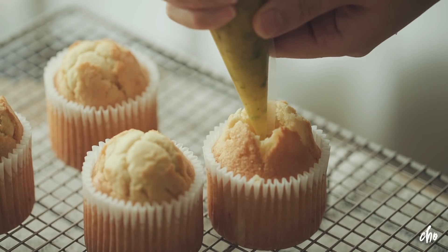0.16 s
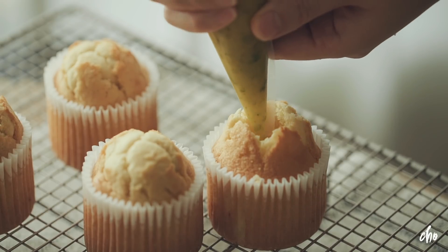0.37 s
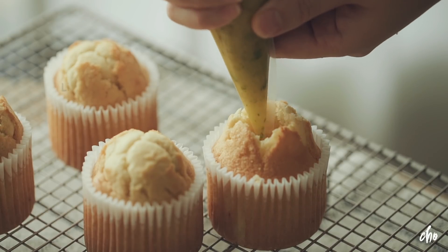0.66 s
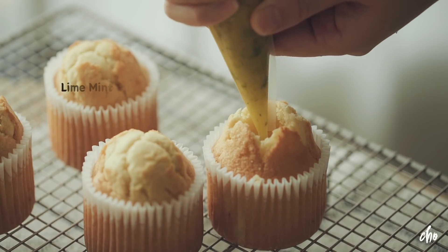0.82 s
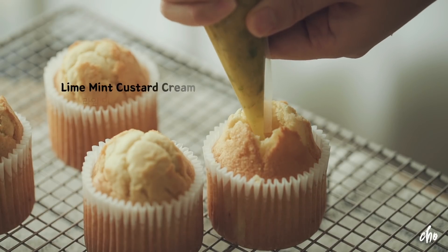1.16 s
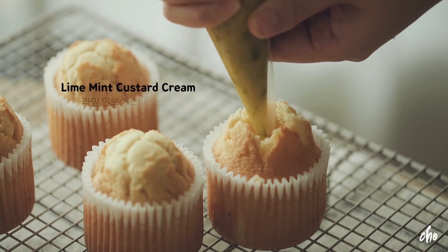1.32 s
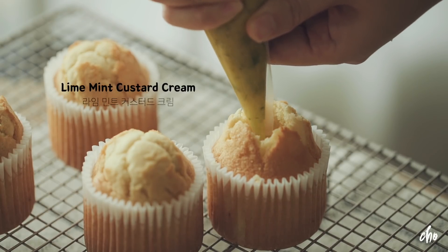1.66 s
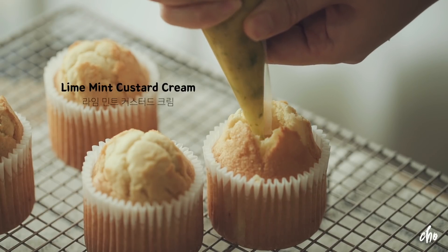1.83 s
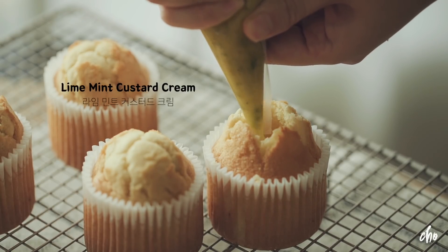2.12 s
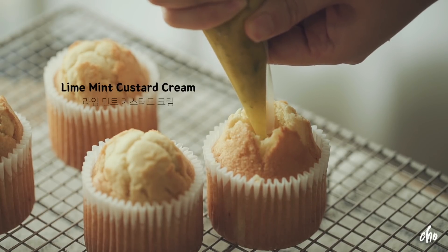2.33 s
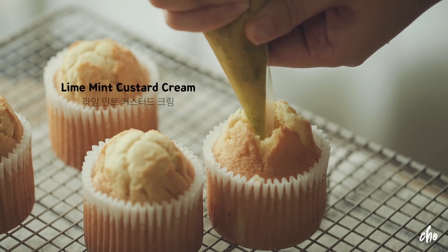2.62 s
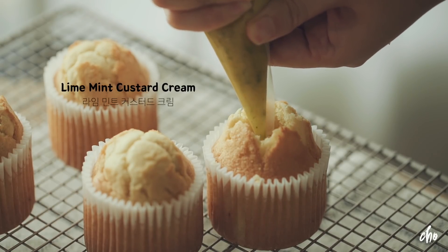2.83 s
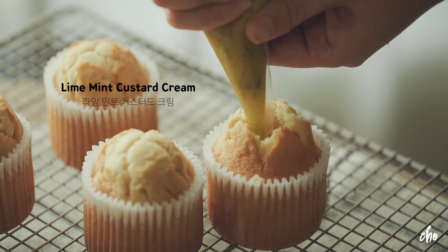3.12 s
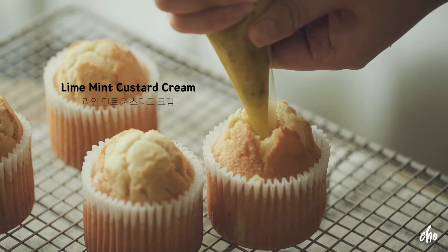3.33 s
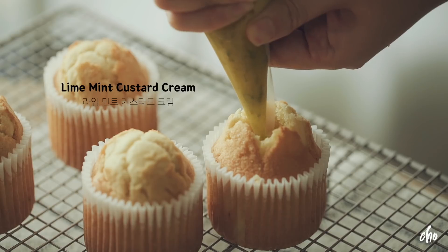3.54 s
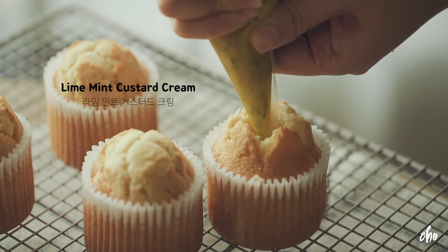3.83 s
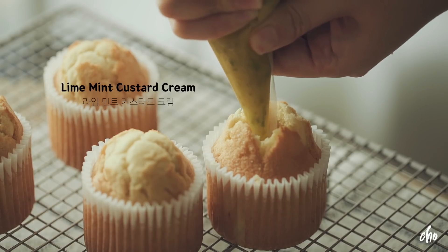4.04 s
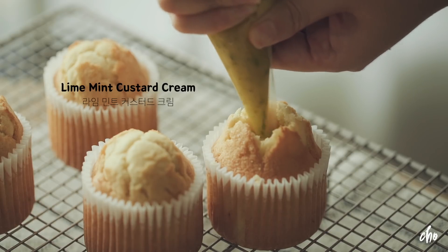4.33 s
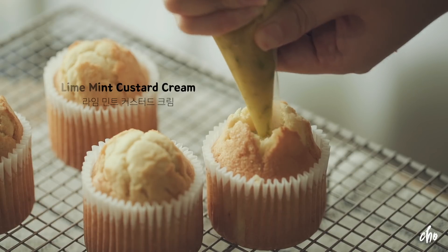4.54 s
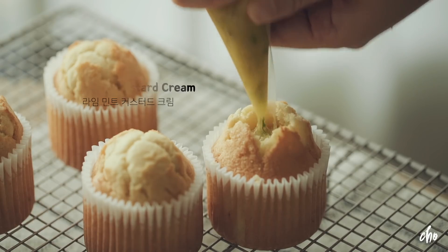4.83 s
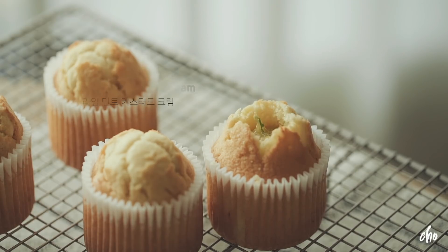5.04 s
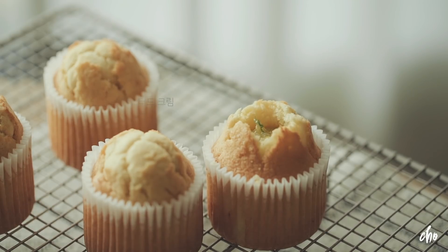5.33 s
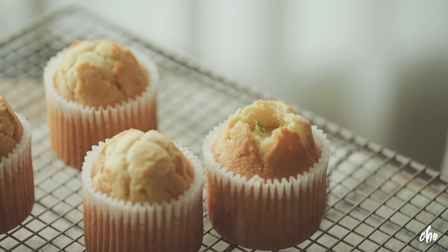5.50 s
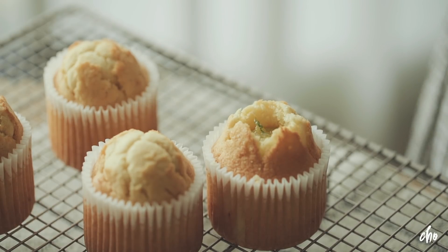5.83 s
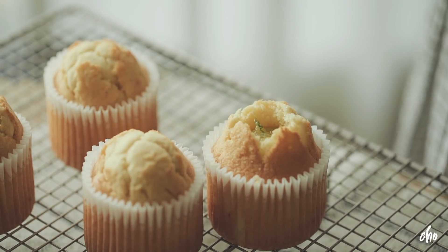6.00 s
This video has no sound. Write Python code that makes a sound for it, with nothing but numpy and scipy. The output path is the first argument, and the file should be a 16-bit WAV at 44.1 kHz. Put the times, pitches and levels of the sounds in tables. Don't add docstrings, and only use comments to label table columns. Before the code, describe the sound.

A thin plastic piping bag ticks and snaps as it is squeezed in a quiet kitchen, then is lifted and dropped in a loud crackling heap.

```python
import sys
import numpy as np
from scipy import signal
from scipy.fft import rfft, irfft, next_fast_len
from scipy.io import wavfile
from scipy.ndimage import map_coordinates

SR = 44100
rng = np.random.default_rng(int(sys.argv[2]) if len(sys.argv) > 2 else 0)


def transcribe(u):
    v = np.clip(np.atleast_2d(u).T, -1, 1)
    q = np.round(v * 32767).astype(np.int16)
    wavfile.write(sys.argv[1], SR, q)


def natural_amplitude(level_db):
    exponent = np.asarray(level_db, float) / 20
    return 10 ** exponent


N = 271656


def unit(x):
    return x / np.sqrt(np.mean(x ** 2) + 1e-20)


def along(points, hz):
    f, v = np.transpose(points)
    return np.interp(np.log(hz + 1), np.log(f + 1), v)


def curves(rows):
    s, *columns = np.transpose(rows)
    return [np.interp(np.arange(N) / SR, s, column, -140, -140) for column in columns]


def wobble(rate):
    knots = rng.standard_normal(int(N * rate / SR) + 4)
    return map_coordinates(knots, [np.arange(N) * rate / SR])


def filtered(x, response):
    m = next_fast_len(N + 8192)
    return irfft(rfft(x, m) * response(np.fft.rfftfreq(m, 1 / SR)), m)[..., :N]


def modes(rows, f):
    total = 0
    for k, (hz, width, db) in enumerate(rows):
        total = total + (-1) ** k * natural_amplitude(db) * 1j * f * width / (hz ** 2 - f * f + 1j * f * width)
    return total


def band(centre_hz, width_hz, f):
    return modes([(centre_hz, width_hz, 0)], f) ** 2


def highpass(corner_hz, f):
    return 1j * f / (1j * f + corner_hz)


def add(track, s, piece):
    i = round(s * SR)
    track[i:i + len(piece)] += piece[:N - i]


# f/Hz, level/dB per Hz
ROOM_MURMUR = [(21, -57), (35, -37), (114, -20), (167, -10.5), (233, -10.5), (265, -4), (317, -13.5),
               (410, -14), (720, -15), (1140, -19.5), (2220, -27.5), (2400, -28), (3180, -30), (16000, -37)]
# f/Hz, likeness (1 = same)
LEFT_RIGHT_LIKENESS = [(60, 1), (130, 0.82), (290, 0.77), (640, 0.37), (1410, 0.44), (3100, -0.025),
                       (6820, -0.37), (15000, -0.1)]
# f/Hz, width/Hz, level/dB
FRIDGE_HUM = [(179, 19, -7.5), (271, 27.4, 1.5), (452, 59, -6.5)]


def air():
    air_db = -54.5

    def split(f):
        turn = np.arccos(np.clip(along(LEFT_RIGHT_LIKENESS, f), -1, 1)) / 2
        return natural_amplitude(along(ROOM_MURMUR, f)) * [np.cos(turn), np.sin(turn)]

    mid, side = filtered(rng.standard_normal((2, N)), split)
    murmur = unit(np.array([mid + side, mid - side]))
    hum = unit(filtered(rng.standard_normal(N), lambda f: modes(FRIDGE_HUM, f)))
    return natural_amplitude(air_db - 1.5 + 0.6 * wobble(3)) * murmur + natural_amplitude(air_db - 7 + 1.2 * wobble(6)) * hum


# f/Hz, time to fall 60 dB/s
ROOM_DECAY = [(300, 0.62), (2000, 0.47), (8000, 0.43), (16000, 0.95)]


def kitchen(x, rise_s, top_hz):
    noise = rng.standard_normal(SR // 2) + 0.5 * rng.standard_normal((2, SR // 2))
    hz, t, z = signal.stft(noise, SR, nperseg=256)
    decay = natural_amplitude(-60 * t / along(ROOM_DECAY, hz)[:, None])
    shape = decay * (1 - np.exp(-t / rise_s)) / np.hypot(1, hz / top_hz)[:, None]
    tail = signal.istft(z * shape, SR, nperseg=256)[1]
    delayed = np.pad(x, (150, 0))[None]
    return signal.fftconvolve(delayed, tail / np.linalg.norm(tail[0]), axes=1)[:, :N]


def pair(x, lead_s, spread):
    def phase(f):
        ripple = np.clip(spread, 0, 1) * np.sin(f / 900) * f / (f + 4000)
        return np.pi * f * lead_s + ripple

    return filtered(x, lambda f: np.exp(1j * np.outer([1, -1], phase(f))))


# t/s, force level/dB
DRAG_FORCE = [
    (0.88, -75),
    (0.944, -55),
    (0.994, -64.5),
    (1.042, -36),
    (1.102, -37),
    (1.126, -47),
    (1.318, -48.5),
    (1.4, -63),
    (1.45, -59),
]
# t/s, peak level/dB
DRAG_SLIPS = [(1.018, -29.5), (1.037, -24), (1.053, -23.5), (1.066, -39), (1.076, -24.5), (1.087, -22.5),
              (1.11, -40), (1.136, -50), (1.15, -32.5), (1.158, -40), (1.176, -32), (1.204, -47),
              (1.25, -43), (1.27, -35.5), (1.289, -36), (1.323, -41)]
# f/Hz, width/Hz, level/dB
WOODEN_BODY = [(187, 82, -4), (257, 41, -2), (307, 37, 0.5)]
# f/Hz, level/dB per Hz
SCRAPE_COLOUR = [(500, -11), (830, 0.5), (1230, -1), (1600, 0), (1950, -8), (2350, -8.5), (2900, -10.5),
                 (3500, -11.5), (4200, -26), (8000, -24.5), (12000, -120)]


def drag():
    groan_db, = curves(DRAG_FORCE)
    pushes = natural_amplitude(groan_db + 1) * rng.standard_normal(N) / 4
    for s, db in DRAG_SLIPS:
        pushes[round(s * SR)] += natural_amplitude(db + 40) * np.sign(rng.standard_normal())
    groan = filtered(pushes, lambda f: modes(WOODEN_BODY, f) * band(336, 560, f) * highpass(110, f) ** 2)

    late = np.arange(N) / SR - 1.042
    hold_s, rise_db_per_s, fall_db_per_s = 0.027, 130, 74
    scrape_db = -54 + rise_db_per_s * np.minimum(late, 0) - fall_db_per_s * np.maximum(late - hold_s, 0)
    grains = rng.standard_normal(N) * natural_amplitude(wobble(89.3))
    scrape = unit(filtered(grains, lambda f: natural_amplitude(along(SCRAPE_COLOUR, f))))
    return groan + natural_amplitude(scrape_db + 3) * scrape


# f/Hz, width/Hz, level/dB
FOOT_CHIRP = [(1250, 290, -2), (2260, 290, 0)]


def squeal():
    late = np.arange(N) / SR - 0.928
    drop_db = np.where(late < 0, -2500 * late, 90 * late)
    colour = lambda f: sum(natural_amplitude(db) * band(hz, width, f) for hz, width, db in FOOT_CHIRP)
    return natural_amplitude(-56.5 - drop_db) * unit(filtered(rng.standard_normal(N), colour))


# t/s, peak level/dB, f/Hz
BAG_THUDS = [
    (5.626, -31, 377),
    (5.627, -32, 674),
    (5.746, -35.5, 254),
    (5.792, -33.5, 210),
    (5.821, -30.5, 352),
    (5.85, -43, 420),
    (5.996, -43.5, 168),
]
# t/s, peak level/dB, f/Hz
RACK_NUDGES = [
    (0.139, -53, 159),
    (0.289, -58, 129),
    (0.437, -52, 123),
    (0.636, -51, 119),
]


def thuds():
    out, t = np.zeros(N), np.arange(SR // 5) / SR
    for s, db, hz in BAG_THUDS + RACK_NUDGES:
        fading = natural_amplitude(db + 3.5 - 60 * t * hz / 11)
        soft_start = 1 - np.exp(-t * hz / 0.35)
        add(out, s, fading * np.sin(2 * np.pi * hz * t) * soft_start)
    return filtered(out, lambda f: highpass(70, f) ** 2)


# t/s, spread/s, level/dB, ring f/Hz
FINGER_SWIPES = [
    (0.495, 0.0074, -42.5, 2360),
    (.5, 0.0084, -49.5, 1080),
    (.575, 0.0099, -58.5, 7000),
    (5.02, 0.057, -64, 2060),
    (5.465, 0.021, -56, 4900),
]


def swipes():
    t, out = np.arange(N) / SR, np.zeros(N)
    for s, spread, db, hz in FINGER_SWIPES:
        grains = rng.standard_normal(N) * natural_amplitude(2.3 * wobble(500))
        colour = lambda f: band(hz, 0.29 * hz, f) + 0.29 * modes([(2850, 2900, 0)], f)
        stroke = np.exp(-0.5 * ((t - s) / spread) ** 2)
        out += natural_amplitude(db) * stroke * unit(filtered(grains, colour))
    return out


def low_push():
    start_s, length_s = 5.748, 0.003
    t = (np.arange(N) / SR - start_s) / length_s
    return -natural_amplitude(-38 + np.array([[-2.5], [2.5]])) * np.sin(np.pi * np.clip(t, 0, 1)) ** 2


# t/s, speed level/dB, slackness/dB
GRIP_STROKE = [
    (0.0, -56.5, -2),
    (0.074, -66, -2),
    (0.2, -69, -1),
    (0.334, -85, -9),
    (0.502, -55, -4),
    (0.72, -76.5, 0),
]
# t/s, speed level/dB, slackness/dB
LIFT_STROKE = [
    (4.7, -78, -9),
    (4.878, -64, -4),
    (5.066, -52, -6),
    (5.156, -49, -2),
    (5.236, -52.5, -4.5),
    (5.3, -60.5, 9),
    (5.426, -57, -0.5),
    (5.51, -52, -1),
]
# t/s, speed level/dB, slackness/dB
DROP_STROKE = [
    (5.51, -61.5, 20),
    (5.58, -43, -12),
    (5.698, -40.5, -9),
    (5.744, -46.5, -12),
    (5.748, -47.5, 19),
    (5.884, -62, 21),
    (6.026, -54.5, 5),
    (6.16, -64, 5),
]
# f/Hz, width/Hz
SLIDE_BANDS = [(1300, 4600), (3300, 2700), (9000, 40000)]
# level over the speed/dB, share of the slackness
SLIDE_LAW = [(-1, 0.8), (-26.5, 0.43), (-4.5, 0.15)]
# f/Hz, width/Hz, level/dB
FILM_POCKETS = [(1710, 690, -9), (2310, 230, -32), (3120, 2800, -23.5), (4800, 660, -12.5),
                (7000, 280, -35)]


def rustle():
    out = np.zeros((2, N))
    grain = natural_amplitude(0.8 * wobble(40) + 3 * wobble(600))
    tick_here = rng.random(N) < 420 / SR
    tick_size = natural_amplitude(4.4 * np.minimum(rng.exponential(size=N), 1.9))
    ticks = tick_here * tick_size * np.sign(rng.standard_normal(N))
    strokes = [curves(rows) for rows in (GRIP_STROKE, LIFT_STROKE, DROP_STROKE)]
    for shape, (db, share) in zip(SLIDE_BANDS, SLIDE_LAW):
        level = sum(natural_amplitude(speed_db + db + share * slack_db) for speed_db, slack_db in strokes)
        hiss = rng.standard_normal(N) + 0.5 * rng.standard_normal((2, N))
        slips = grain * hiss + 4.5 * ticks
        pockets = lambda f: 0.76 + np.abs(modes(FILM_POCKETS, f))
        colour = lambda f: band(*shape, f) * pockets(f) / (1 + (f / 13000) ** 6)
        out += level * natural_amplitude(1.6 * wobble(14)) * unit(filtered(slips, colour))
    return out


def fold(db, levels, shapes, t60, cracks, first):
    size = 2048
    f, t = np.fft.rfftfreq(size, 1 / SR), np.arange(size) / SR
    fuzz, spikes = rng.standard_normal(size), rng.random(size)
    crackle = 0.31 * np.sign(fuzz) * (spikes < cracks / SR)
    burst = (0.096 * fuzz + crackle) * natural_amplitude(-60 * t / max(t60, 0.002))
    burst[0] = -first
    colour = sum(natural_amplitude(level) * band(*shape, f) for level, shape in zip(levels, shapes))
    colour = colour / (1 + 1j * f / 9000) ** 2
    return natural_amplitude(db) * irfft(rfft(burst / np.linalg.norm(burst)) * colour)[:-size // 8]


# t/s, size level/dB, dullness/dB, crackle level/dB
SMALL_TICKS = [(0.001, -36.5, -6, -8), (0.019, -38.5, 8, -30), (0.057, -35, 1.5, -13),
               (0.071, -34, 3.5, -16), (0.083, -38, 2, -8), (0.1, -33, -3, -14), (0.128, -32, 1, -15.5),
               (0.146, -37, 6, -8), (0.168, -33, -2, -14), (0.259, -34.5, 0, -10.5),
               (0.288, -34, -1, -10.5), (0.386, -36, -2, -9), (0.43, -30.5, 1.5, -12.5),
               (0.446, -30, 4, -17), (0.635, -35.5, -10, -9.5)]
# f/Hz, width/Hz
TICK_COLOURS = [(1000, 580), (2100, 590), (4500, 3700)]
# t/s, size level/dB, ring f/Hz, crackle level/dB
HAND_FOLDS = [(1.363, -37.5, 1970, -4), (2.779, -27, 1086, -11.5), (3.166, -39.5, 1500, -19),
              (3.371, -29, 1300, -10.5), (3.433, -35, 1410, -12), (4.828, -26, 1060, -20),
              (4.91, -42, 2600, -14), (4.927, -41, 4300, -7), (4.999, -30.5, 2050, -4),
              (5.025, -33.5, 1900, -7), (5.074, -29, 1070, -9), (5.136, -19.5, 1720, -14),
              (5.154, -25, 974, -8), (5.189, -40, 1100, -4), (5.23, -35, 3000, -1), (4.841, -45, 4000, -14),
              (5.094, -39, 1700, -20), (5.283, -36, 1060, -5)]
# t/s, size level/dB, ring f/Hz, crackle level/dB
HEAP_FOLDS = [(5.407, -25.5, 1010, -26), (5.427, -37, 1400, -23), (5.452, -27, 931, -18),
              (5.512, -18, 1580, -22), (5.529, -31, 1300, -21), (5.588, -10, 1630, -14),
              (5.626, -15, 3460, -22), (5.703, -9, 1250, -10), (5.7477, -2.5, 2400, 5),
              (5.7501, -7, 1510, -7), (5.766, -7, 2800, -30), (5.793, -8.5, 1580, -35),
              (5.812, -5, 3450, -6.5), (5.822, -11, 2750, -20), (5.849, -8, 2770, -15),
              (5.863, -19.5, 3200, -31), (5.988, -23.5, 2780, -13), (6.042, -22.5, 2400, -35)]


def folds():
    out = np.zeros(N)
    for s, db, dull_db, crackle_db in SMALL_TICKS:
        levels = (dull_db, 0, crackle_db)
        add(out, s + 0.001, fold(db + 24.5, levels, TICK_COLOURS, t60=0.011, cracks=570, first=0.65))
    for s, db, hz, crackle_db in HAND_FOLDS + HEAP_FOLDS:
        belly_db = 7.5 * np.tanh((1300 - hz) / 200)
        levels = (min(belly_db, 0), min(-belly_db, 0), crackle_db)
        shapes = [(1050, 800), (max(hz, 1600), 600 + 0.46 * hz), (6500, 4500)]
        t60 = (0.013 + 15 / hz) * natural_amplitude(-0.22 * (crackle_db + 12))
        add(out, s + 0.000978, fold(db + 20, levels, shapes, t60, cracks=1100, first=1.11))
    return out


# t/s, cone ring level/dB, sharpness/dB
CREASE_SNAPS = [(1.392, -31.5, 3.5), (1.618, -18.5, 6), (2.2721, -21, 3.5), (2.278, -11.5, 8),
                (2.3935, -24.5, 3.5), (2.52, -32, -9), (2.5318, -26.5, 1.5), (2.5566, -25, 3.5),
                (2.7356, -9.5, -5.5), (2.7430, -22.5, 1), (2.9317, -23, -4), (2.9438, -11.5, -1.5),
                (2.9901, -2.5, -2), (3.04, -37, 6), (3.1208, -26, -1.5), (3.2195, -24.5, -3),
                (3.2645, -28.5, -4), (3.4754, -22.5, 3), (3.5107, -27, -5), (3.5882, -27, -3.5),
                (3.9155, -30, -5), (3.9657, -11.5, 9), (3.9766, -31, 3), (4.0717, -21, 4.5),
                (4.34, -32.5, -1), (4.3502, -30, 2.5), (4.3883, -26.5, 2.5), (5.048, -29.5, 4.5),
                (5.0623, -34, 6), (5.1051, -11, -0.5)]
# t/s, cone ring level/dB
FAINT_POPS = [(0.199, -41), (0.8081, -32.5), (0.9745, -33), (1.6606, -30.5), (1.722, -38.5),
              (1.8365, -39.5), (1.9874, -33.5), (2.1056, -35), (2.1331, -44), (2.145, -42), (2.153, -39),
              (2.288, -32), (2.482, -40), (2.6559, -35.5), (2.6808, -39), (2.699, -34), (2.834, -36),
              (2.8913, -38), (3.465, -32.5), (3.7393, -35), (3.8098, -33.5), (3.8418, -39), (4.141, -39.5),
              (4.173, -41.5), (4.372, -46), (3.493, -34), (3.503, -36), (3.747, -38.5), (3.764, -41),
              (4.205, -43)]
# f/Hz, width/Hz
BAG_PARTS = [(1780, 500), (3550, 830), (11500, 5400)]
# f/Hz, width/Hz, level/dB
CREAM_PUSH = [(610, 1000, 0)]


def snaps():
    out, size = np.zeros(N), 1024
    f, t = np.fft.rfftfreq(size, 1 / SR), np.arange(size) / SR
    events = [(s, db, sharp_db, 0) for s, db, sharp_db in CREASE_SNAPS]
    events += [(s, db, -1.8, 1) for s, db in FAINT_POPS]
    for s, size_db, sharp_db, extra_wall_db in events:
        luck, fuzz = rng.standard_normal(3), rng.standard_normal(size)
        jump = 0.044 * fuzz * natural_amplitude(-60 * t / 0.015)
        jump[0] = -1
        wall_db = min(-3 + 0.5 * s, 4.5) + extra_wall_db
        levels = (14, wall_db + 12, sharp_db + 7)
        climbs = (0, 0.058 * (s - 3), 0)
        rings = [(hz * (1 + 0.046 * chance + climb), width, size_db + db)
                 for (hz, width), chance, db, climb in zip(BAG_PARTS, luck, levels, climbs)]
        body = modes(rings, f) - natural_amplitude(size_db) * modes(CREAM_PUSH, f)
        add(out, s + 0.0012, irfft(rfft(jump) * body * highpass(600, f))[:-size // 8])
    return out


def scene():
    far = drag() + squeal()
    slack = folds() + thuds() + swipes()
    taut = snaps()
    near = pair(taut, lead_s=2.2e-5, spread=0.09) + pair(slack, lead_s=8e-6, spread=0.47) + low_push()
    room = natural_amplitude(-24.5) * kitchen(taut, rise_s=0.013, top_hz=5760)
    room += natural_amplitude(-14.5) * kitchen(slack, rise_s=0.0014, top_hz=4000)
    room += natural_amplitude(-7.5) * kitchen(far, rise_s=0.0023, top_hz=9000)
    return air() + far + room + rustle() + near


def low_pass(x):
    return signal.sosfilt(signal.butter(12, 16530, fs=SR, output="sos"), x)


def record(dry):
    limited = filtered(dry, lambda f: 1 / (1 + (f / 16230) ** 80))
    mix = np.clip(limited - np.array([[0.001], [0.0006]]), -1, 1)
    return low_pass(mix)


dry = scene()
out = record(dry)
transcribe(out)
```